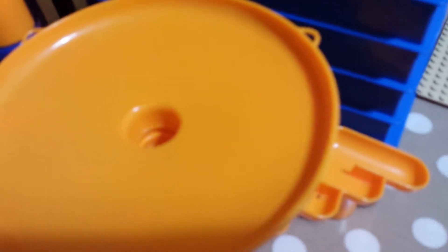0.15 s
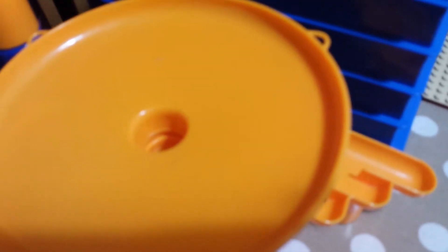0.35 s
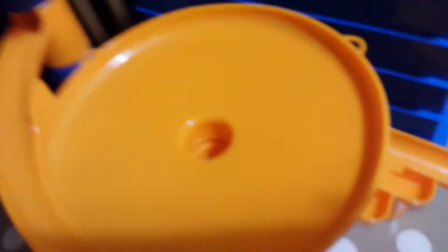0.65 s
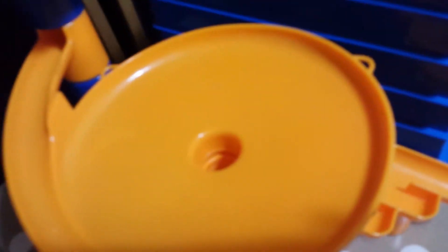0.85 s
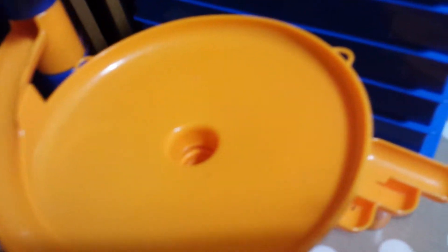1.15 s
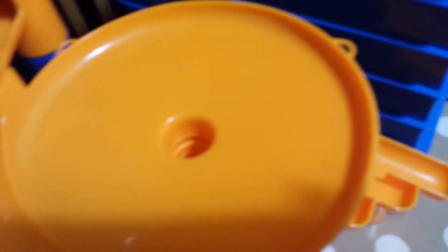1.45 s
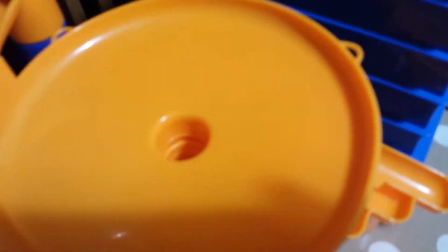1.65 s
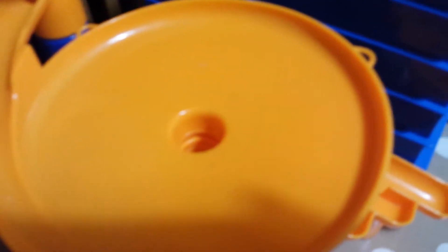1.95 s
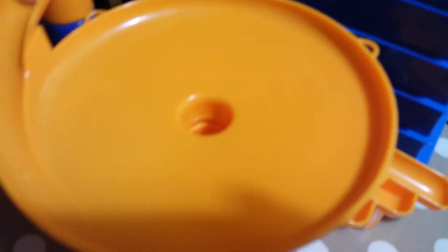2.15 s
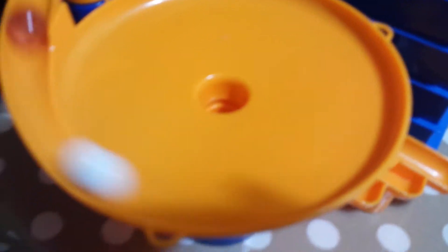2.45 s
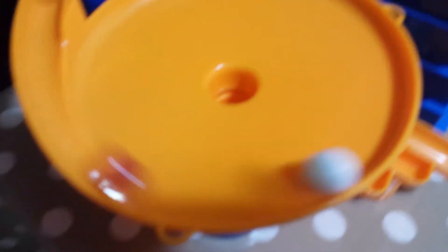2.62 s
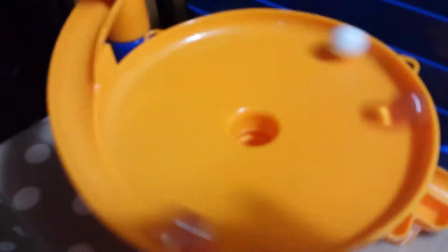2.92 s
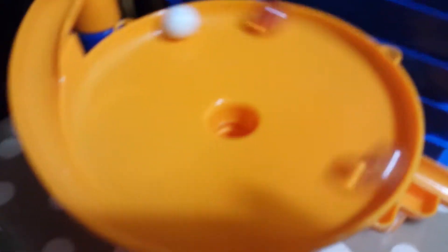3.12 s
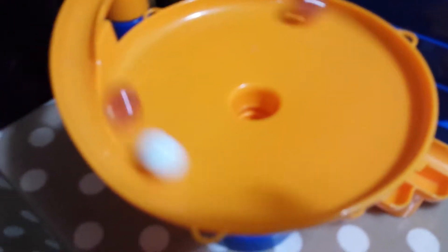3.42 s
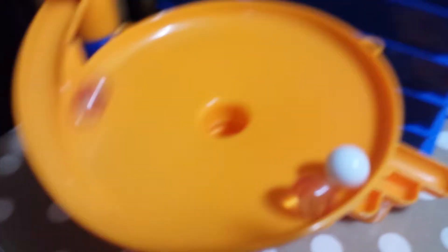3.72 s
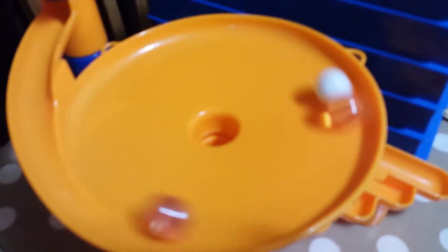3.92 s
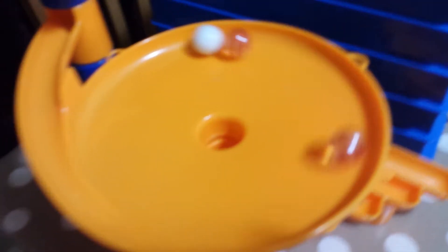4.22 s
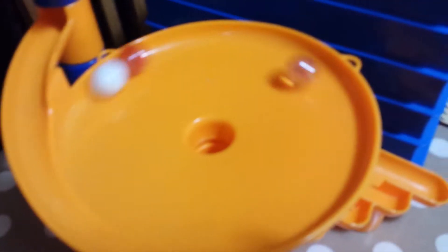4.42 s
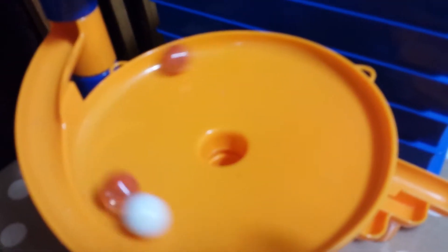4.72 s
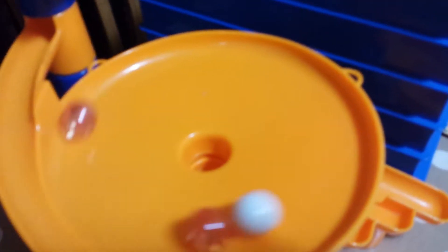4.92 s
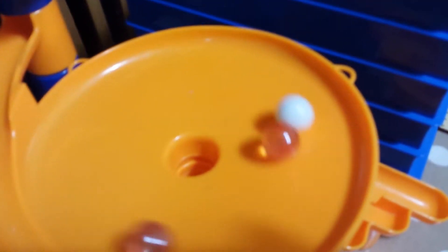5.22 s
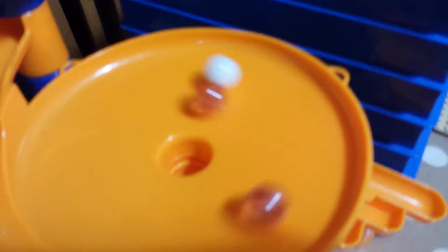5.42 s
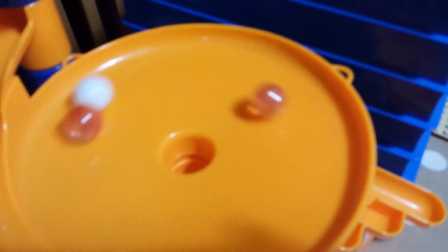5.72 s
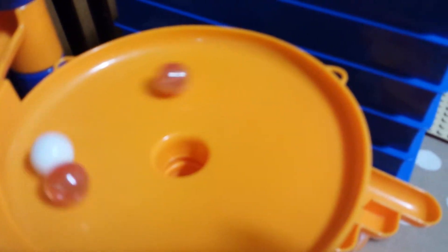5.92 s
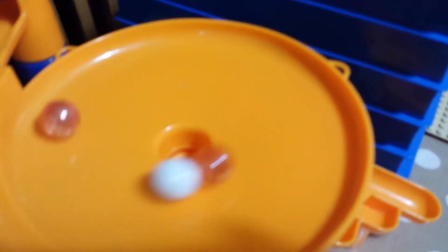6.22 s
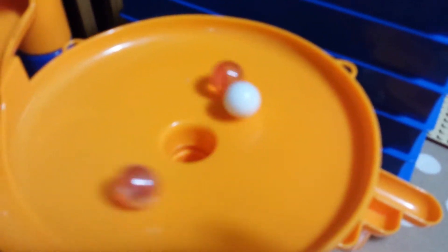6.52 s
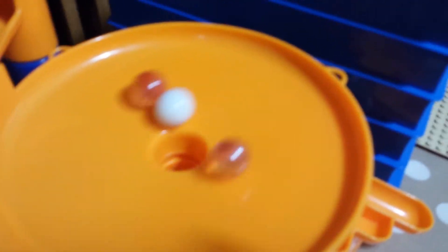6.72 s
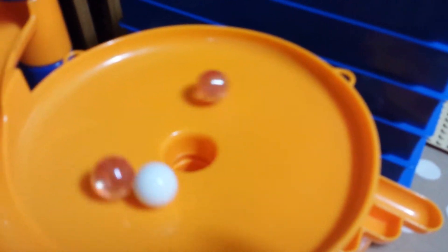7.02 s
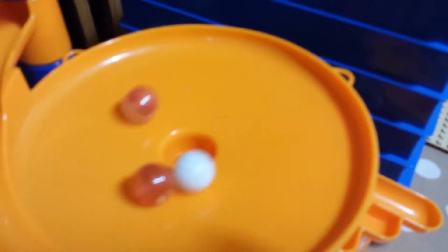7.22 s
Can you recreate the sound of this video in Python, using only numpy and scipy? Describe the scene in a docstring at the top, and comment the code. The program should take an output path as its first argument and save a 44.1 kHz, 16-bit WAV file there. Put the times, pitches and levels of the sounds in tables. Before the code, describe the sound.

Glass marbles in a plastic toy, heard through two unmatched handheld microphones close by: the right bright and facing the dish, the left duller with grip thuds. Soft rustling and a glass clink lead to a sharp cup knock, a dense bright chatter down the chute, then continuous rolling with irregular bumps, swelling and slowly fading in a small indoor space.

```python
"""Glass marbles in a plastic chute and dish

A hand drops marbles into a cup, an impact that rings its modes; they clatter down a chute (single knocks
over a chatter of tiny impacts) and roll round a dish (a wandering contact that excites its modes, with bumps).
Fingers brush as shaped noise, and glass clinks. Two unlike hand-held microphones listen close by: the right
one is bright and faces the dish, the left one is shaded from it and picks up thuds and rumble of the grip."""
import sys
import numpy as np
from scipy import signal
from scipy.fft import rfft, irfft
from scipy.io import wavfile
from scipy.ndimage import uniform_filter1d

SR = 44100
rng = np.random.default_rng(int(sys.argv[2]) if len(sys.argv) > 2 else 0)


def dump_mix(stems):
    """Bounce the given channels to the path in sys.argv[1] as a 16-bit WAV at rate SR."""
    frames = np.atleast_2d(stems).T  # one column per channel
    limited = np.clip(frames, -1, 1)  # hard clip at full scale
    pcm = np.round(limited * 32767).astype(np.int16)
    wavfile.write(sys.argv[1], SR, pcm)


N = 324135

# Low murmur of the house. Each row: frequency in Hz, relative density in dB per Hz.
HUM_TONE = [(25, -7), (130, -2), (300, -11.5), (900, -25)]
# Rumble carried through table and grip. Each row: frequency in Hz, relative density in dB per Hz.
RUMBLE_TONE = [(25, -5), (60, -3), (150, 1.5), (400, 5), (540, 4.5), (900, -25)]
# The stand shakes while loaded and while marbles tumble. Each row: start in seconds, length in s, level in dB.
SHAKES = [(.55, 0.98, -80.5), (1.5, 0.45, -52), (1.7, 0.77, -58.5)]
# Fingers shifting on the microphone housing. Each row: time in seconds, level of the push in dB,
# time constant of the push in seconds, crack in dB over the push.
THUDS = [(0.565, -44, 0.0005, 11), (0.5802, -28.5, 0.0006, 14), (0.592, -19, 0.00099, 6.5),
         (0.6095, -42, 0.0006, 1), (0.663, -23, 0.001, -2), (0.6735, -41, 0.0005, 13),
         (0.6816, -30, 0.00049, -7), (0.689, -41, 0.00057, 7), (0.786, -14, 0.0009, -24),
         (1.011, -20, 0.00077, -21), (1.188, -22.5, 0.00069, -6), (1.305, -28, 0.00055, 0),
         (3.848, -15.5, 0.00078, 0), (4.247, -16, 0.0021, -3), (4.847, -6, 0.00076, -10),
         (5.16, -28, 0.0006, -2), (5.176, -2.5, 0.00067, -2), (6.747, -9.5, 0.00046, -9),
         (7.288, -18.5, 0.00068, -6)]
# Fingers brushing glass and plastic. Each row: start in seconds, length in seconds, hiss in dB,
# body in dB over the hiss, crest as a share of the length (held within 0.1 to 0.9).
BRUSHES = [(.16, 0.13, -67.5, -10, 0.5), (0.379, 0.035, -69, 3, 0.7), (0.554, 0.2, -61, 1, 0.26),
           (0.738, 0.57, -66.5, 2, 0.28), (0.813, 0.066, -55.5, 6, 0.71), (.925, 0.095, -53, -3, .12),
           (0.992, 1, -56, -2.5, 0.02), (1.5, 0.048, -72, 16.5, .12)]
# Friction noise. Each row: frequency in Hz, relative density in dB per Hz.
SCUFF_TONE = [(300, -0.5), (1000, 0.5), (2000, -2.5), (3000, 0), (5000, -8.5), (7200, 3.5), (9500, -10),
              (15000, -17)]
# Its balance, used for glass too. Each row: frequency in Hz, left over right in dB.
SCUFF_SIDE = [(60, 10), (150, 0), (380, -3), (950, -2), (2380, 7), (5980, -11.5), (15000, -12)]
# Two marbles clicking together in the hand. Each row: time in seconds, peak in dB.
CLINKS = [(0.5706, -17), (0.5766, -41)]
# Modes of the glass. Each row: frequency in Hz, width in Hz, relative level in dB.
GLASS_MODES = [(1380, 180, -8), (3720, 170, -1), (6450, 230, 9), (7120, 430, 11.5), (7880, 220, 3)]
# Its dense small modes. Each row: frequency in Hz, relative density in dB per Hz.
GLASS_TONE = [(400, -6.5), (1300, -4), (3500, -15), (5200, -11.5), (7000, -15), (9500, -31), (15000, -33)]
# A marble dropped into the cup atop the chute, and its bounces. Each row: time in seconds, peak in dB.
DROPS = [(1.0115, 1.1), (1.025, -17), (1.0351, -6), (1.053, -16.5)]
# Modes of the cup. Each row: frequency in Hz, width in Hz, relative level in dB.
CUP_MODES = [(1294, 65, -1.5), (1490, 33, 1), (1870, 43, -20), (2600, 50, -8), (2770, 39, 0.5),
             (3030, 43, 7), (3253, 45, 10), (3810, 110, 4), (4717, 67, 3), (5350, 74, -2), (5250, 80, 5),
             (6370, 420, -2.5)]
# Its dense small modes. Each row: frequency in Hz, relative density in dB per Hz.
CUP_TONE = [(300, -24), (1300, -11), (2000, -13), (3600, -4), (5500, -11), (8000, -15), (15000, -57)]
# Balance of the cup. Each row: frequency in Hz, left over right in dB.
CUP_SIDE = [(60, 1), (180, -1), (550, -8.5), (1650, 7), (4970, 9.5), (15000, -30)]
# Marbles knocking on the chute. Each row: time in seconds, peak in dB, treble in dB over the knock.
KNOCKS = [(1.167, -32, -18), (1.291, -43.5, -15), (1.557, -22, -15), (1.6615, -15, 5), (1.6665, -15.5, 9),
          (1.6799, -15, -7), (1.686, -19, 5), (1.695, -8.5, -3.5), (1.7124, -3, -6.5), (1.731, -9, -2),
          (1.748, -12.5, 2), (1.776, -10.5, -5), (1.7863, -13, -2), (1.8013, -12, -1.5), (1.811, -11.5, -1),
          (1.815, -10, 0), (1.823, -9.5, -5), (1.8407, -13, -7), (1.854, -16, 3), (1.8694, -18, -8),
          (1.885, -14.5, 0), (1.902, -17, -2), (1.923, -7.5, -7), (1.9343, -22.5, 8), (1.941, -11, -3),
          (1.9555, -13.5, 1), (1.978, -22, 5), (1.9885, -13.5, -2), (2.0104, -13.5, -2.5),
          (2.0468, -20, -4), (2.097, -28.5, 3), (2.1347, -18.5, 3), (2.175, -32, -24), (2.1884, -13.5, -4),
          (2.2216, -18, -3), (2.2261, -6.5, -5), (2.2417, -14, -8), (2.275, -21, -6), (2.285, -31, -3),
          (2.295, -22, -7), (2.302, -15.5, -17), (2.322, -19, -4), (2.333, -21, 3.5), (2.3416, -16.5, -5),
          (2.39, -11, -8), (2.3975, -19.5, -13), (2.443, -17.5, -15), (2.446, -13, -32), (2.4652, -19, -12),
          (2.4911, -14.5, -15), (2.495, -27, -36), (2.516, -30, -12), (2.5403, -32.5, -7),
          (2.571, -35, -17)]
# Marbles running along the chute. Each row: start in seconds, length in seconds, level in dB,
# treble in dB over it.
RUNS = [(1.54, 0.12, -32.5, -17), (1.585, 0.085, -31, -10), (1.66, 0.34, -34, -15),
        (1.915, 0.24, -30.5, -13.5), (2.2, 0.19, -42.5, -24)]
# Marbles passing the microphones on their way down. Each row: time in seconds, lean to the left in dB.
PASSING = [(1.2, 1), (1.6, -6), (1.8, 7.5), (2.0, 2), (2.3, 9.5), (2.55, 10)]
# Modes of the chute. Each row: frequency in Hz, width in Hz, relative level in dB.
CHUTE_MODES = [(1560, 34, -9), (2150, 75, 1), (2470, 33, 2), (2990, 80, 5), (4610, 240, 1.5),
               (4900, 44, 2.5), (5730, 170, -21), (6720, 590, -11), (7500, 530, 4.5)]
# Its dense small modes. Each row: frequency in Hz, relative density in dB per Hz.
CHUTE_TONE = [(120, -12), (200, -36), (498, -30.5), (598, -8.5), (730, -23), (1100, -7.5), (1500, -3),
              (2350, -17.5), (2980, 6), (3800, -4), (4300, -13.5), (4780, -11), (7830, -7.5),
              (15700, -32.5)]
# Balance of the chute. Each row: frequency in Hz, left over right in dB.
CHUTE_SIDE = [(60, 3), (120, -12), (240, -13), (480, -13.5), (950, -4), (1890, -0.5), (3770, 11.5),
              (7520, -20), (15000, -10.5)]
# Rolling in the dish. Each row: time in seconds, drone of the bowl in dB, glassy grit in dB, rim ring in dB.
ROLL = [(2.15, -61, -83, -55), (2.6, -50, -58, -49), (3.31, -47, -60, -47), (3.49, -41, -54, -45.5),
        (3.66, -37, -45, -36.5), (3.85, -36, -44.5, -38), (4.21, -37.5, -46, -43), (4.54, -33, -43.5, -36),
        (4.91, -36, -45.5, -42.5), (5.07, -34.5, -47, -44.5), (5.47, -39, -47.5, -40.5),
        (5.72, -41, -50, -47.5), (5.97, -40, -47, -56), (6.19, -41.5, -45, -43.5),
        (6.43, -45.5, -51, -48.5), (6.8, -45, -48.5, -41.5), (7.1, -52.5, -55, -55.5),
        (7.35, -52.5, -53.5, -55)]
# Marbles bumping each other and the rim. Each row: time in seconds, rattle peak in dB,
# rim in dB over the rattle, grit in dB over the rattle.
BUMPS = [(2.668, -38.5, -12, -6), (2.826, -32.5, 0, -2.5), (3.19, -33.5, -8, -11), (3.242, -34.5, -23, -8),
         (3.4203, -26.5, -4.5, -10), (3.5206, -25.5, -3.5, -2), (3.5713, -27.5, -14, -5),
         (3.6203, -39.5, -10, 20), (3.7152, -21, -4, 2), (3.7313, -17.5, -11, 6), (3.7585, -24, -2.5, -4),
         (3.8717, -21.5, -11, -6), (4.2319, -39.5, -14, 30.5), (4.2423, -30, 2, -3), (4.295, -29, 1.5, 5.5),
         (4.4454, -29.5, -7, 3), (4.499, -30, -16, 8), (4.5372, -32, -5, 3), (4.5852, -21.5, -5, -5),
         (4.6946, -30.5, -13, 11), (4.7592, -29, -0.5, 6), (4.8265, -22.5, -0.5, -2.5),
         (4.8642, -26, -14, 4.5), (4.9703, -30.5, -7, -12), (5.0183, -15, -4, -6.5),
         (5.075, -18.5, -2.5, -3.5), (5.1104, -21.5, -8, -18), (5.242, -25.5, 1, -5),
         (5.345, -40.5, -10, 26.5), (5.377, -30.5, 2, 7), (5.4567, -24.5, -27, -2),
         (5.5376, -25, -4.5, 2.5), (5.576, -27, -2.5, -23), (5.714, -34, -2, 9.5), (5.7487, -27, -23, -23),
         (5.861, -26.5, -14, -20), (5.9387, -36.5, -10, 17), (5.9891, -17, -12, -8),
         (6.058, -29.5, -26, -2), (6.15, -35, -14, -19), (6.23, -31, -4, -24), (6.299, -39, 17, 8),
         (6.32, -26, 6, -4), (6.3652, -32, 6.5, 4), (6.5845, -31, -6, -29), (6.6081, -27.5, -12, 8),
         (6.6672, -25, -6, -25), (6.7213, -25, 4, 3), (6.731, -18.5, -36, -6), (6.768, -47, -2, 28.5),
         (6.792, -39.5, 16, 9), (6.811, -53, 3, -10), (6.856, -35, 9, -8), (6.9046, -35.5, 2.5, -32),
         (7.2955, -31, -1.5, -25)]
# Marbles grinding together as they roll side by side. Each row: start in seconds, length in seconds,
# grit in dB, rattle in dB over the grit.
GRINDS = [(3.68, 0.11, -38, -1), (5.97, 0.17, -46.5, -12), (7.27, 0.27, -45, -12)]
# Modes of the dish. Each row: frequency in Hz, width in Hz, relative level in dB.
DISH_MODES = [(569, 31, -2.5), (619, 15, -1), (654, 17, 0.5), (751, 55, -14), (828.6, 31, -1),
              (919, 94, -6), (1058, 34, -16), (1202, 65, -11.5), (1280, 23, 2.5), (1326, 40, -5.5),
              (1482, 24, -5), (1501, 47, -1), (1661, 51, -3.5), (1960, 150, -11), (2315, 350, -9.5),
              (2622, 180, -8.5), (2956, 29, -7.5), (4564, 170, -24)]
# Its dense small modes. Each row: frequency in Hz, relative density in dB per Hz.
DISH_TONE = [(100, -8), (500, -27.5), (570, -19), (1720, -10), (1880, -14.5), (3100, -18.5), (3600, -31),
             (5400, -26.5), (7300, -20.5), (9500, -35), (15000, -48.5)]
# Balance of the dish. Each row: frequency in Hz, left over right in dB.
DISH_SIDE = [(60, -27), (110, -26), (200, -36), (380, -11), (700, -3.5), (1290, -6), (2380, -4),
             (4400, -15.5), (8120, -35.5), (15000, -28.5)]
# Likeness of the two microphones. Each row: frequency in Hz, shared part from 0 to 1.
LIKENESS = [(100, 0.51), (500, 1), (1300, 0.86), (2000, 0.22), (4000, 0.21), (9000, 0.18)]
# Reverberation of the room. Each row: frequency in Hz, time to fall by 60 dB in seconds.
ROOM_T60 = [(300, 0.86), (1200, 0.36), (3000, 0.31), (7000, 0.14), (14000, 0.36)]

TAPS = 4096  # samples computed for one ring
LAG_S = 0.00018  # the left microphone is farther from the dish
EDGE_HZ = 15800  # upper band limit of the microphones
HUM_DB, HISS_DB, HISS_BODY_DB = -68.5, -74.5, -1.5  # house murmur; room hiss, and its body over it
# rumble: at rest in dB; in dB while the grit of the roll is at LOUD_DB; dB per dB of grit
REST_DB, CARRIED_DB, LOUD_DB, STEEPNESS = -79, -46.5, -45, 1.05
CRACK_HZ, CRACK_S = 1700, 0.00011  # the housing snaps: one short swing
RUN_CREST, SHAKE_CREST = 0.46, 0.38  # a swell crests this far through its length
# upper drone and rattle blend drone and grit: (share that follows the grit 0-1, dB over the blend)
UPPER, RATTLE = (0.24, 4.16), (0.066, -8.5)
INWARD_S, SINK_DB_PER_S, SUNK_DB = 5.025, 45, 11  # the upper drone sinks once marbles spiral in from the rim


def gain_of(db):
    """Level to amplitude: 20 dB is a factor of ten."""
    return 10 ** (np.asarray(db) / 20)


def evened(x):
    """Normalisation by energy: the mean of the channels gets rms 1."""
    return x / np.sqrt(np.mean(np.atleast_2d(x).mean(0) ** 2) + 1e-20)


def peaked(x):
    """Normalisation by amplitude: the mean of the channels gets peak 1."""
    return x / abs(x.mean(0)).max()


def read(points, hz):
    """Interpolation of a spectrum along a logarithmic frequency axis."""
    f, value = np.transpose(points)
    return np.interp(np.log(hz + 1), np.log(f + 1), value)


def curves(rows):
    """Linear interpolation of levels in time, near silence outside the rows."""
    s, *columns = np.transpose(rows)
    return [np.interp(np.arange(N) / SR, s, c, -120, -120) for c in columns]


def swells(rows, crest):
    """Amplitude envelopes: overlapping arches, one per row; later columns are dB over the first."""
    start, length, db, *over_db = np.transpose(rows)[:, :, None]
    progress = np.clip((np.arange(N) / SR - start) / length, 0, 1)
    warped = progress ** (np.log(.5) / np.log(np.clip(crest, .1, .9)))  # puts the crest at one half
    arch = abs(np.sin(np.pi * warped)) ** 1.8
    return [(arch * gain_of(db + over)).sum(0) for over in [0] + over_db]


def add(mix, s, sound):
    """Superposition: a two-channel sound is summed into the mix from a given time."""
    part = mix[:, round(s * SR):][:, :sound.shape[1]]
    part += sound[:, :part.shape[1]]


def split(x, edges_hz):
    """Band analysis by causal filters between neighbouring edges."""
    bands = zip(edges_hz, edges_hz[1:])
    return [signal.sosfilt(signal.butter(4, band, "band", fs=SR, output="sos"), x) for band in bands]


def causal(db):
    """Minimum phase: of all filters with this gain, the one of least delay."""
    log_gain = np.log(gain_of(np.r_[db, db[-2:0:-1]]))
    return np.exp(np.conj(signal.hilbert(log_gain)))[:len(db)]


def pair(a, b, hz, side):
    """Partial coherence: two microphones share part of a spectrum, with a lag and unlike colour."""
    same, lean_db = np.clip(read(LIKENESS, hz), 0, 1), read(side, hz) / 2
    delay = np.exp(-2j * np.pi * hz * LAG_S)
    left = (same * a + np.sqrt(1 - same ** 2) * b) * delay
    power_kept = np.sqrt(2 / (gain_of(lean_db) ** 2 + gain_of(-lean_db) ** 2))
    return np.array([left * causal(lean_db), a * causal(-lean_db)]) * power_kept


def noise(tone, side):
    """Stationary random sound: white noise weighted by a spectrum, in both microphones."""
    size = N + N % 2
    hz = np.fft.rfftfreq(size, 1 / SR)
    a, b = rfft(rng.standard_normal((2, size))) * gain_of(read(tone, hz))
    return evened(irfft(pair(a, b, hz, side))[:, :N])


def ring(modes, tone, side, t60, dense_db, spot_db, tick, stray=0.0069):
    """Modal response to a blow on a random spot: a tick, damped modes and a dying rustle of dense modes."""
    t, hz = np.arange(TAPS) / SR, np.fft.rfftfreq(TAPS, 1 / SR)
    f, width, db = np.transpose(modes)[:, :, None]
    f = f * (1 + stray * rng.standard_normal(f.shape))  # no two spots ring at quite the same pitch
    share = gain_of(db + spot_db * rng.standard_normal(db.shape)) * width
    phase = 2 * np.pi * rng.random((2, len(f), 1))
    damped = share * np.exp(-np.pi * width * t) * np.sin(2 * np.pi * f * t + phase)
    build_up = 1 - np.exp(-t / .0005)  # modes take a moment to build up
    tones = build_up * damped.sum(1) / SR * 2 * np.pi
    rustle = rng.standard_normal((2, TAPS)) * gain_of(-60 * t / t60)
    rustle /= np.linalg.norm(rustle[0])
    rustle[:, 0] = tick
    a, b = rfft(tones) + rfft(rustle) * causal(read(tone, hz) + dense_db)
    kept = TAPS * 3 // 4
    fade = np.hanning(TAPS * 3 // 2)[kept:]
    return irfft(pair(a, b, hz, side))[:, :kept] * fade


def blow(length_s):
    """Contact force: glass digs in over a moment and touches repeatedly within milliseconds."""
    t = np.arange(1000) / SR
    touches = 0.29 * rng.standard_normal(1000) * (rng.random(1000) < .1)
    touches[30] = .5  # one sure touch
    return (touches * np.minimum(t / 0.00079, 1) * np.exp(-t / length_s))[None]


def clicks(per_s, spread_db, flutter_db, flutter_s):
    """Roughness excitation: tiny impacts on surface bumps, a few large, in a fluttering contact force."""
    size = gain_of(spread_db * np.minimum(rng.exponential(1, N), 5)) * rng.choice([-1, 1], N)
    span = round(flutter_s * SR)
    flutter = evened(uniform_filter1d(uniform_filter1d(rng.standard_normal(N), span), span))
    return size * (rng.random(N) < per_s / SR) * gain_of(flutter_db * flutter)


def skips(per_s, spread_db, length_s):
    """Exponential relaxation: the gain jumps and dies away each time a marble skips over a seam."""
    jumps = gain_of(spread_db * np.minimum(rng.standard_normal(N), 2)) * (rng.random(N) < per_s / SR)
    dying = signal.lfilter([1], [1, -np.exp(-1 / (length_s * SR))], jumps)
    return 1 + uniform_filter1d(dying, size=60)


def travel(force, rings, spots_per_s):
    """Moving excitation: the contact wanders from spot to spot, so the colour keeps changing."""
    pace = 1 + .6 * evened(uniform_filter1d(rng.standard_normal(N), 4000))
    place, count = np.cumsum(pace) / SR * spots_per_s, len(rings)
    out = np.zeros((2, N))
    for k, spot in enumerate(rings):
        away = abs((place - k + count / 2) % count - count / 2)
        near = np.cos(np.pi / 2 * np.minimum(away, 1))
        out += signal.oaconvolve((force * near)[None], spot, axes=1)[:, :N]
    return out


def room(x):
    """Reverberation: sparse reflections of random sign, each band decaying at its own speed."""
    taps = np.zeros((2, SR // 2))
    starts = np.arange(300, SR // 2 - 20, 20)
    at = starts + rng.integers(0, 20, (2, len(starts)))
    np.put_along_axis(taps, at, rng.choice([-1., 1.], at.shape), 1)
    hz, t, z = signal.stft(taps, SR, nperseg=256)
    decay = gain_of(-60 * t / read(ROOM_T60, hz)[:, None])
    tail = signal.istft(z * decay, SR, nperseg=256)[1]
    return signal.fftconvolve(x, tail / np.linalg.norm(tail[0]), axes=1)[:, :N]


def murmur():
    """Stationary low noise: the murmur of the house."""
    return gain_of(HUM_DB) * noise(HUM_TONE, [(60, 7), (400, -2.0)])


def rumble():
    """Structure-borne sound: lumpy low noise that follows the roll and the shaking stand."""
    lumps_db = 1.8 * evened(uniform_filter1d(rng.standard_normal(N), 1500))
    grit_db = curves(ROLL)[1]
    carried = gain_of(CARRIED_DB + STEEPNESS * (grit_db - LOUD_DB))
    gain = gain_of(REST_DB) + carried + swells(SHAKES, SHAKE_CREST)[0]
    return gain * gain_of(lumps_db) * noise(RUMBLE_TONE, [(60, 0.5), (400, -3.5)])


def thuds():
    """Handling noise: short pushes, mostly on the left microphone's housing, each with a crack."""
    out, t = np.zeros((2, N)), np.arange(2000) / SR
    for s, db, length_s, crack_db in THUDS:
        slow = t / max(length_s, 1e-4)
        fast = t / CRACK_S - 3
        push = (slow ** 2 / 2 - slow) * np.exp(-slow)
        swing = np.exp(-fast ** 2 / 2) * np.sin(2 * np.pi * CRACK_HZ * CRACK_S * fast + 0.34)
        creep = evened(uniform_filter1d(rng.standard_normal(len(t)), 60))  # the skin creeps on
        creep = 0.081 * creep * np.minimum(slow, 1) * np.exp(-t / 0.0096)
        thud = push - gain_of(crack_db) * swing + creep
        add(out, s - 2 * CRACK_S, gain_of(db) * gain_of([[0], [-20.]]) * thud)
    return out


def fingers():
    """Friction: soft noise swells over the room's hiss; marbles clink in the hand."""
    body, hiss = split(noise(SCUFF_TONE, SCUFF_SIDE), (300, 5000, 17000))
    brushes = np.array(BRUSHES)
    hiss_gain, body_gain = swells(brushes[:, :4], brushes[:, 4:])
    out = (hiss_gain + gain_of(HISS_DB)) * evened(hiss)
    out += (body_gain + gain_of(HISS_DB + HISS_BODY_DB)) * evened(body)
    for s, db in CLINKS:
        spot = ring(GLASS_MODES, GLASS_TONE, SCUFF_SIDE, t60=0.11, dense_db=-5.0, spot_db=3.0, tick=0.21)
        add(out, s, gain_of(db) * peaked(signal.fftconvolve(blow(0.0047), spot, axes=1)))
    return out


def cup():
    """Impact on a resonator: the dropped marble and its bounces ring the modes of the cup."""
    out = np.zeros((2, N))
    for s, db in DROPS:
        spot = ring(CUP_MODES, CUP_TONE, CUP_SIDE, t60=0.24, dense_db=-1.0, spot_db=1.0, tick=0.46)
        add(out, s, gain_of(db) * peaked(signal.fftconvolve(blow(0.0022), spot, axes=1)))
    return out


def chute_ring():
    """Modal response of one spot of the chute."""
    return ring(CHUTE_MODES, CHUTE_TONE, CHUTE_SIDE, t60=0.035, dense_db=4.5, spot_db=5.0, tick=.55, stray=0.014)


def chute():
    """Impact and roughness excitation: single knocks over a running chatter."""
    out, edges_hz = np.zeros((2, N)), (150, 5500, 17000)
    for s, db, treble_db in KNOCKS:
        knock, treble = split(signal.fftconvolve(blow(0.00092), chute_ring(), axes=1), edges_hz)
        add(out, s, gain_of(db) * (peaked(knock) + gain_of(treble_db) * peaked(treble)))
    force = clicks(6000, spread_db=2.6, flutter_db=2.2, flutter_s=0.0017)
    run = travel(force, [chute_ring() for _ in range(8)], spots_per_s=28.0)
    body, treble = split(run, edges_hz)
    hum = split(run, (540, 700))[0]  # the dish hums along with the chute that feeds it
    gain, treble_gain = swells(RUNS, RUN_CREST)
    out += gain * (evened(body) + gain_of(-12.5) * evened(hum)) + treble_gain * evened(treble)
    lean_db = np.interp(np.arange(N) / SR, *np.transpose(PASSING)) / 2
    return out * gain_of([lean_db, -lean_db])


def dish_ring(tick):
    """Modal response of one spot of the dish."""
    return ring(DISH_MODES, DISH_TONE, DISH_SIDE, t60=0.057, dense_db=-3.0, spot_db=2.5, tick=tick, stray=0.0064)


def bumps():
    """Impact excitation: contact time and sharpness set the colour of each bump in the dish."""
    out = np.zeros((2, N))
    for s, db, rim_db, grit_db in BUMPS:
        tick = 0.33 * gain_of(1.6 * grit_db)  # glass on glass is bright and sharp
        # grazing the rim chatters longer, glass on glass is brief
        length_s = .003 * gain_of(.8 * max(rim_db, 0) - .8 * max(grit_db, 0))
        bump = signal.fftconvolve(blow(length_s), dish_ring(tick), axes=1)
        parts = split(bump, (555, 720, 1200, 1350, 4200, 17000))
        levels_db = (rim_db - 10.5, rim_db - 13.0, rim_db, 0, grit_db)
        add(out, s, sum(gain_of(db + over) * peaked(part) for over, part in zip(levels_db, parts)))
    return out


def rolling():
    """Rolling contact: roughness drives the modes of the dish, band by band, with skips and grinding."""
    edges_hz = (545, 720, 1150, 1800, 4200, 17000)
    # spots unlike in colour, alike in strength
    spots = [sum(map(evened, split(dish_ring(0.66), edges_hz))) for _ in range(12)]
    force = clicks(8000, spread_db=2.2, flutter_db=.7, flutter_s=.008)
    *drones, rattle, grit = split(travel(force, spots, spots_per_s=31.), edges_hz)
    grind, grind_rattle = swells(GRINDS, RUN_CREST)
    out = grind * evened(grit) + grind_rattle * evened(rattle)
    skip = skips(90., spread_db=6.05, length_s=0.0041)
    drone_db, grit_db, rim_db = curves(ROLL)
    upper_db, rattle_db = (drone_db + share * (grit_db - drone_db) + db for share, db in (UPPER, RATTLE))
    sunk_db = np.clip(SINK_DB_PER_S * (np.arange(N) / SR - INWARD_S), 0, SUNK_DB)
    levels_db = (drone_db, upper_db - sunk_db, rim_db, rattle_db, grit_db)
    # skips show most in the treble
    parts = [drone * skip ** .45 for drone in drones] + [rattle * skip ** .8, grit * skip]
    return out + sum(gain_of(db) * evened(part) for db, part in zip(levels_db, parts))


def scene():
    """Superposition of background, hand, cup, chute and dish, with the room's reverberation."""
    background = murmur() + rumble() + thuds() + fingers()
    clatter, dish = cup() + chute(), bumps() + rolling()
    wet = room(gain_of(-12.0) * clatter + gain_of(-10.5) * dish)
    return background + clatter + dish + wet


def record(dry):
    """Transducer limits: small microphones lose deep bass, the loudest knocks clip, the top is cut."""
    thin = signal.sosfilt(signal.butter(2, 55., "high", fs=SR, output="sos"), dry)
    band_limit = signal.firwin(511, EDGE_HZ, window=("kaiser", 9), fs=SR)
    return signal.oaconvolve(np.clip(thin, -1, 1), band_limit[None], "same")


dry = scene()
out = record(dry)
dump_mix(out)
```